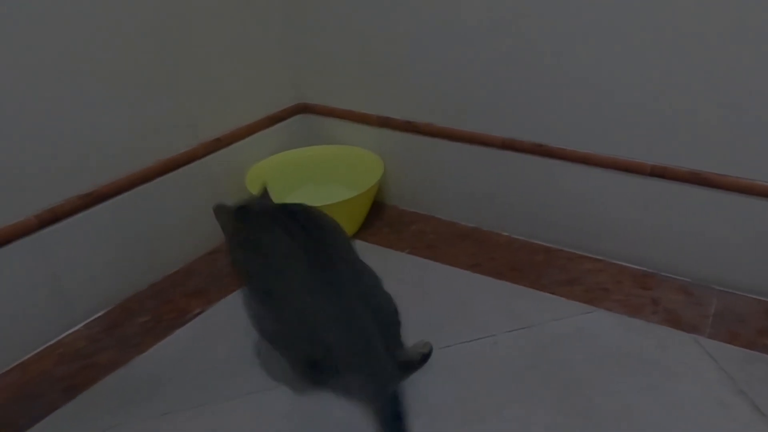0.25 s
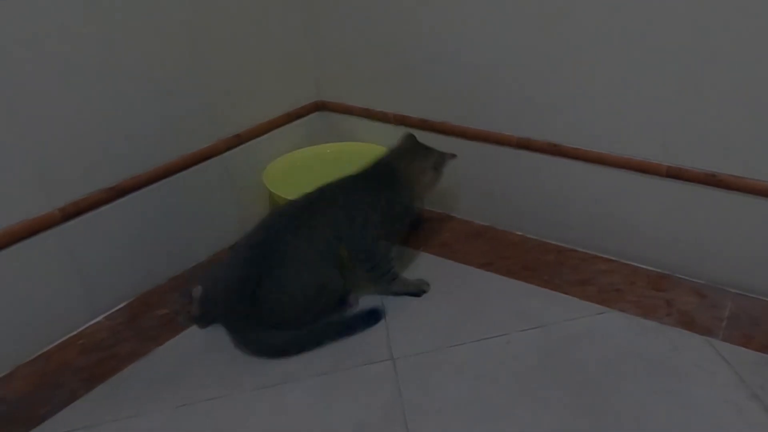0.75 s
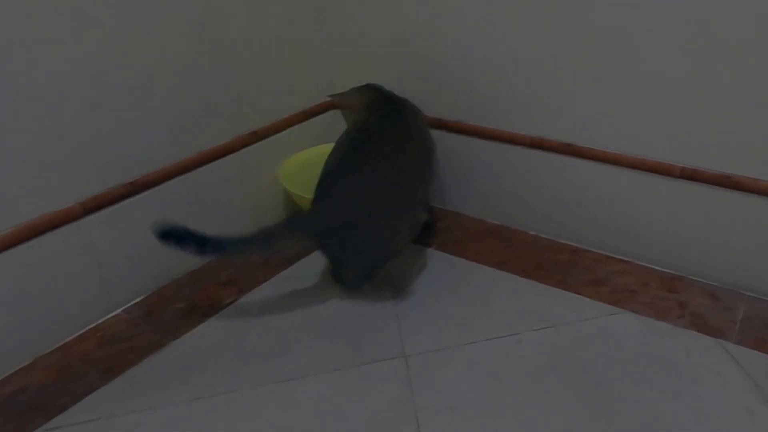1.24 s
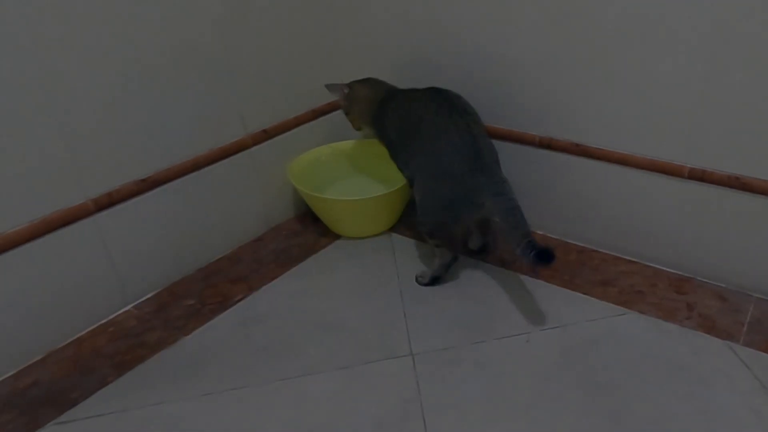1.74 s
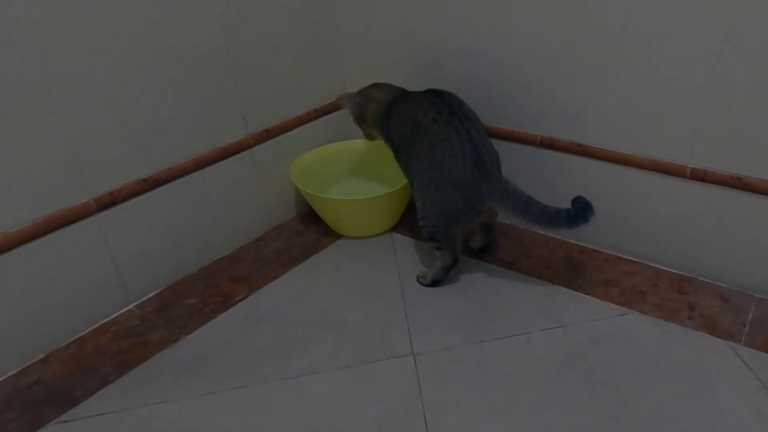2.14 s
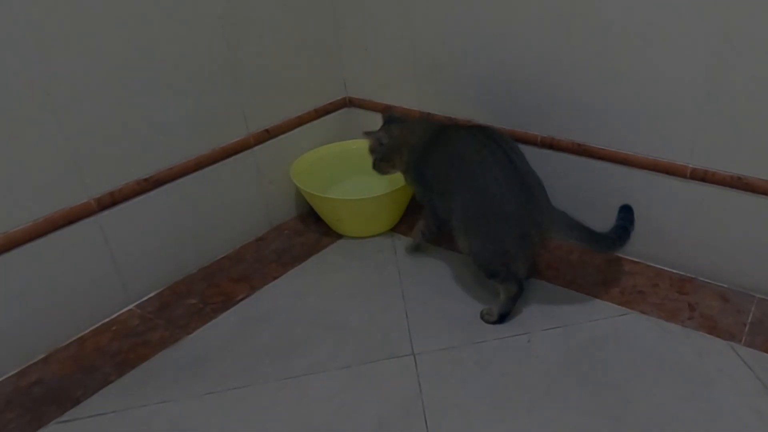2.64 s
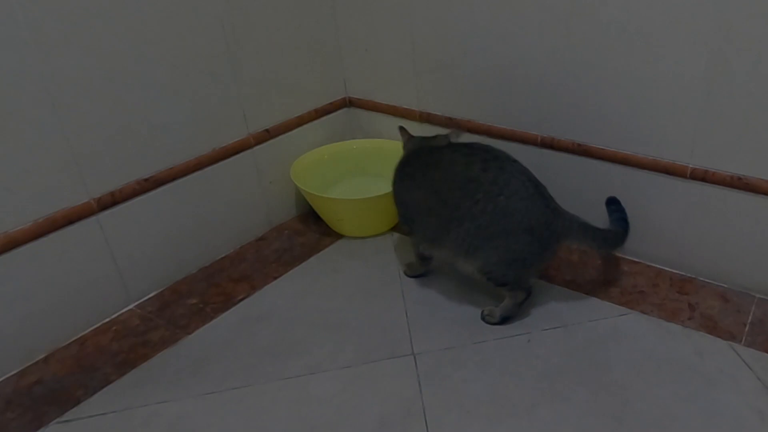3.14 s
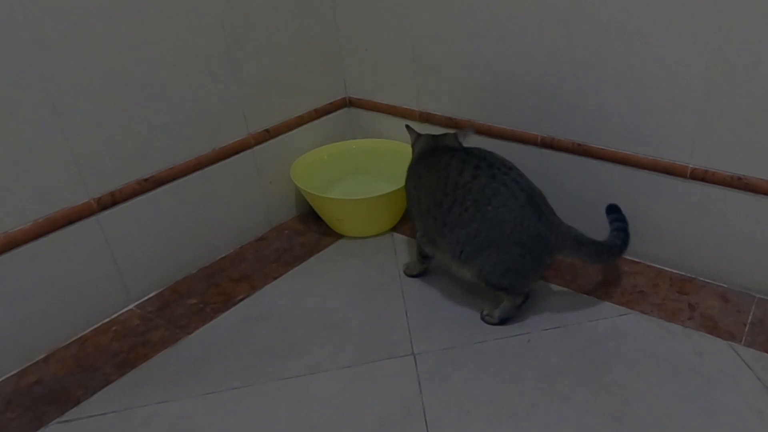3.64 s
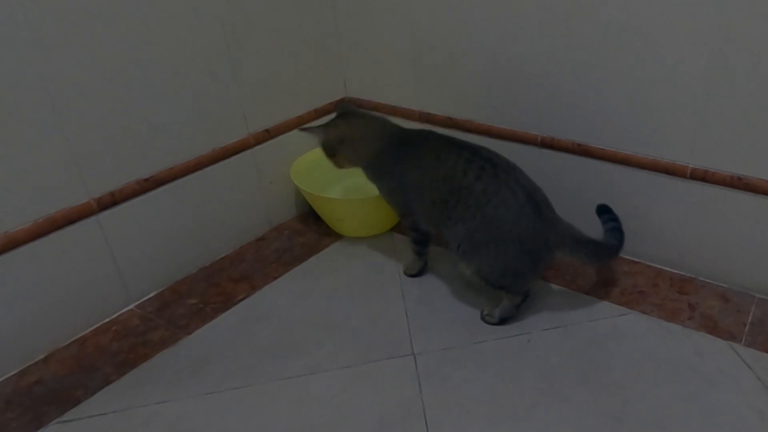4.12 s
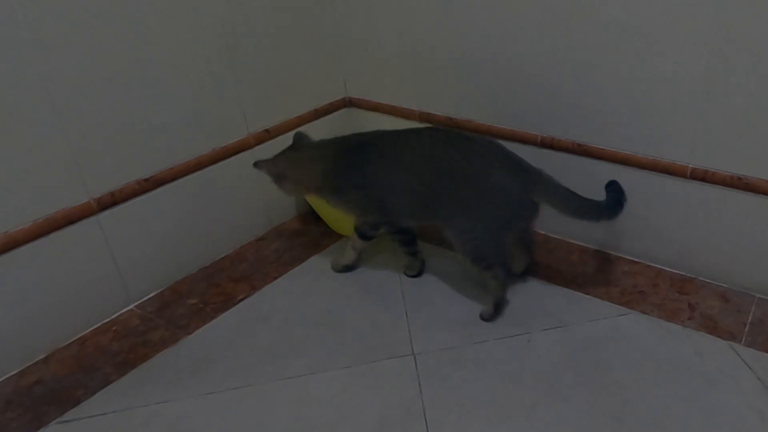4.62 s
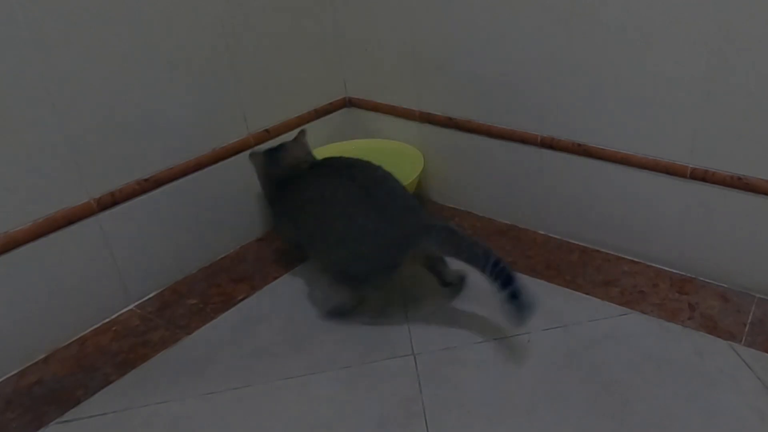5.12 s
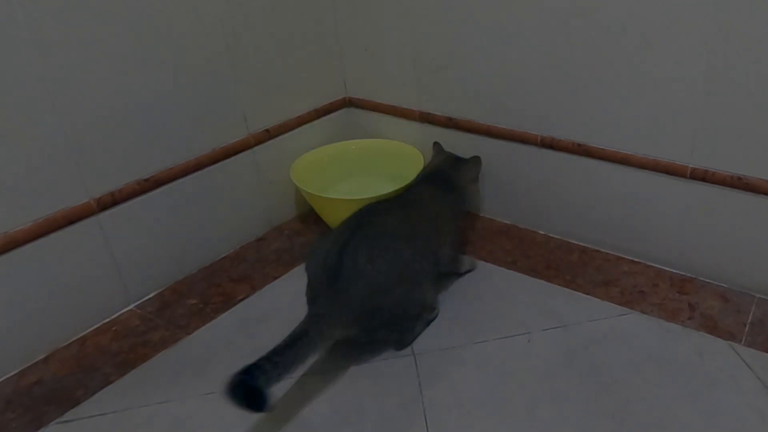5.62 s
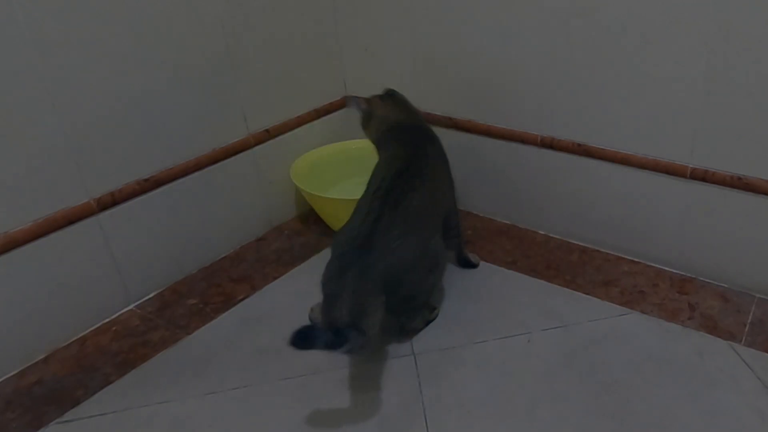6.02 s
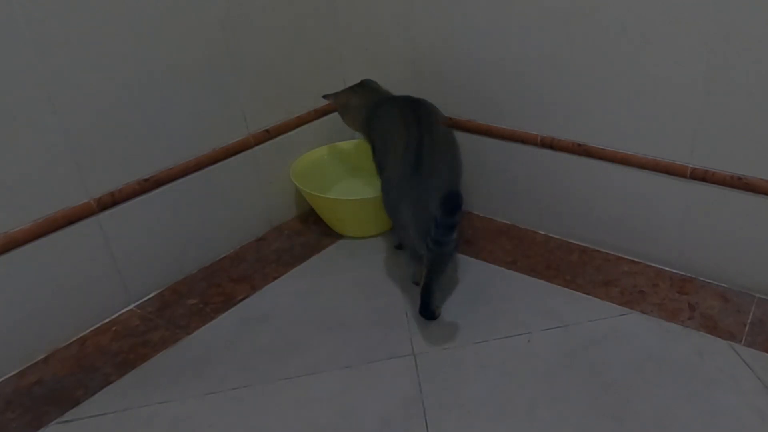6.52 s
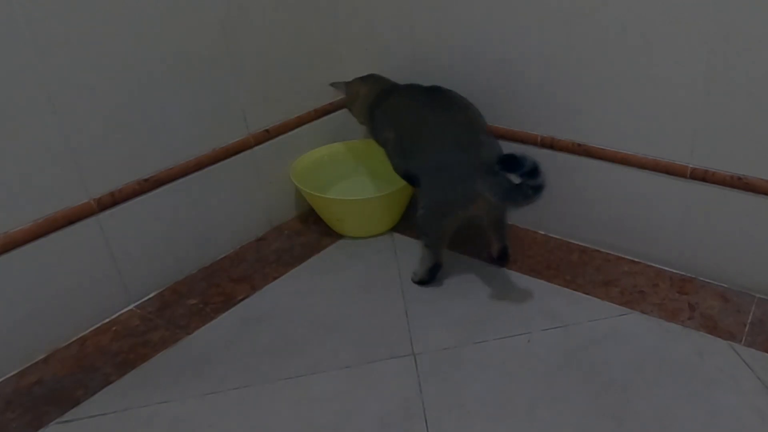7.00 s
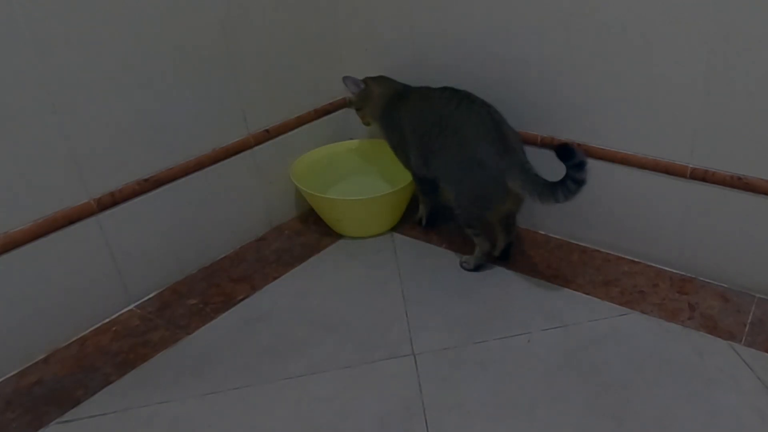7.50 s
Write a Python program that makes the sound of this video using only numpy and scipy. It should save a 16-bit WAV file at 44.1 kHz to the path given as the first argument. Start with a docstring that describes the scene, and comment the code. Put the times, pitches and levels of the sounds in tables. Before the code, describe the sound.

A cornered mouse lets out raspy squeals and tiny chirps amid paw thumps, claw ticks and sharp hisses, echoing in a tiled room over low hum.

```python
"""Cat and mouse in a tiled room

A cat corners a mouse behind a plastic basin; a steady hum, low rumble and faint moving air lie beneath.
The mouse's squeals and chirps are swept tones with overtones and rasp; hisses are shaped random clicks.
Paws thump and scuffle and claws tick as noise bursts; blows ring the basin as decaying sines.
The hard walls add a decaying noise reverberation of about a second."""
import sys
import numpy as np
from scipy import signal
from scipy.fft import rfft, irfft, next_fast_len
from scipy.io import wavfile
from scipy.ndimage import uniform_filter1d

SR = 44100
rng = np.random.default_rng(int(sys.argv[2]) if len(sys.argv) > 2 else 0)


def file_out(sig):
    """Save sig as 16-bit WAV at sys.argv[1]."""
    # one column per channel
    cols = np.atleast_2d(sig).T
    # limit, then scale
    lim = np.clip(cols, -1, 1)
    pcm = np.round(lim * 32767).astype(np.int16)
    wavfile.write(sys.argv[1], SR, pcm)


N = 342039
TIME = np.arange(N) / SR
TOP_HZ = 15200  # upper band edge

# Paw blows on basin and floor. Each row: start in seconds, level in dB, decay time in seconds,
# boom of the basin relative to the blow in dB.
THUMPS = [(.005, -38.5, 0.03, -9), (0.519, -38, 0.02, 4), (0.55, -41, 0.068, 0), (0.877, -30, 0.016, -3.5),
          (.905, -34.5, 0.081, 4.5), (1.354, -42, 0.026, -35), (1.536, -45.5, 0.039, -8.5),
          (1.733, -47.5, 0.022, -14), (2.593, -49.5, 0.077, -15), (2.815, -50.5, 0.21, 9.5),
          (3.13, -50, 0.023, 6.5), (3.73, -53.5, 0.037, -15), (4.17, -46.5, 0.12, -25)]
# Microphone pair. Each row: frequency in Hz, side minus mid of diffuse sound in dB, left minus right in dB.
PORTS = [(30.1, -6.5, -7.5), (100, -4.5, -0.5), (401, -5, -3), (1398, -5.5, 2), (2920, -4, 1.5),
         (5500, -7.5, 0.5), (9000, -5, 3.2), (12430, -2.5, 6)]


def undb(db):
    """Decibels to gain."""
    return 10 ** (np.asarray(db) / 20)


def unit(x):
    """Scale to rms 1."""
    return x / np.sqrt(np.mean(x ** 2))


def at(hz, points, axis=1):
    """Read a column of a table on a log-frequency axis."""
    table = np.array(points, float)
    return np.interp(np.log(hz + 1e-3), np.log(table[:, 0]), table[:, axis])


def shape(x, response):
    """Filter by a gain that is a function of frequency."""
    size = next_fast_len(x.shape[-1] + SR // 2)
    hz = np.fft.rfftfreq(size, 1 / SR)
    return irfft(rfft(x, size) * response(hz), size)[..., :x.shape[-1]]


def colour(x, points):
    """Give a spectrum with skirts of 40 dB per octave; white input keeps its power."""
    def response(hz):
        inside_hz = np.clip(hz + 1, points[0][0], points[-1][0])
        octaves_outside = np.abs(np.log2((hz + 1) / inside_hz))
        return unit(undb(at(hz, points) - 40 * octaves_outside))
    return shape(x, response)


def walk(rate_hz, size):
    """Smooth random wandering with spread near 1."""
    hold = max(int(SR / rate_hz), 1)
    steps = np.repeat(rng.standard_normal(size // hold + 1), hold)
    return 1.2 * uniform_filter1d(steps, hold)[:size]  # 1.2 restores the smoothed spread


def grains(rate_hz, spread_db):
    """Dense random clicks of uneven size, rms 1."""
    clicks = (rng.random(N) < rate_hz / SR) * rng.standard_normal(N)
    return unit(clicks * undb(spread_db * rng.standard_normal(N)))


def add(track, start_s, sound):
    """Mix a sound in at a time."""
    i = int(start_s * SR)
    track[i:i + len(sound)] += sound[:N - i]


def diffuse(mid, side):
    """Sound from all around: the side share at the two ports varies with frequency."""
    side = shape(side, lambda hz: undb(at(hz, PORTS)))
    return np.array([mid + side, mid - side])


def background(hum_hz=100.5, hum_db=-53, rumble_db=-53.5, air_db=-61):
    """A motor hums at about twice the mains rate over low rumble and moving air."""
    # Spectra of rumble and air. Each row: frequency in Hz, relative level in dB.
    rumble_spectrum = [(20, 0.5), (32, -4), (48, -1), (65, -1), (82, -6), (125, -9), (190, -8),
                       (260, -14.5), (500, -22), (900, -28.5)]
    air_spectrum = [(350, -46.5), (600, -13.5), (948, -21.5), (1000, -9), (1230, -10), (1380, -3),
                    (1670, -9), (1910, -8.5), (2310, -13.5), (3020, -7.5), (3650, -27), (5390, -23.5),
                    (9750, -34), (13300, -42.5), (15000, -44.5)]
    rumble_gain = undb(rumble_db + 0.8 * walk(6, N))
    rumble = rumble_gain * colour(rng.standard_normal((2, N)), rumble_spectrum)
    air_gain = undb(air_db + 0.15 * walk(2.8, N))
    air = air_gain * colour(rng.standard_normal((2, N)), air_spectrum)
    hum = undb(hum_db + 0.5 * walk(5.0, N)) * unit(np.sin(2 * np.pi * hum_hz * TIME))
    return diffuse(*(rumble + air)) + hum


def basin(boom_db=-2, build_s=0.023, wobble=0.026, lumpy_db=3):
    """Each blow sets the low modes of basin and corner ringing, with a slightly unsteady pitch and level."""
    # Modes. Each row: frequency in Hz, width in Hz (sets the decay), relative level in dB.
    modes = [(60.5, 6.5, -5), (96, 2.5, -8.5), (143.7, 2.7, -4), (188.4, 2.94, 1), (213.4, 2.14, -5.5),
             (337, 4.2, -8), (374.5, 3, -9.5), (515, 6.5, -9)]
    out, t = np.zeros(N), TIME[:SR]
    for start_s, db, _, share_db in THUMPS:
        ring = 0
        for hz, width_hz, mode_db in modes:
            cycles = np.cumsum(hz * (1 + wobble * walk(40, SR))) / SR + rng.random()
            gain = undb(mode_db + lumpy_db * walk(30, SR))
            ring = ring + gain * np.exp(-np.pi * width_hz * t) * np.sin(2 * np.pi * cycles)
        build_up = 1 - np.exp(-t / build_s)
        add(out, start_s, undb(db + share_db + boom_db) * ring * build_up)
    return out


def burst(start_s, decay_s):
    """A sudden rise and an exponential fall."""
    age = TIME - start_s
    return (age >= 0) * np.exp(-np.clip(age / decay_s, 0, 20))


def slide(peak_s, rise_s, fall_s):
    """An exponential swell up to a peak and an exponential fall after it."""
    distance = np.maximum((peak_s - TIME) / rise_s, (TIME - peak_s) / fall_s)
    return np.exp(-np.minimum(distance, 20))


def paws(tick_s=0.0026):
    """Soft blows land, feet scrape in fits and claws tick on the tiles."""
    # Feet sliding. Each row: time of the hardest push in seconds, level in dB, rise and fall in seconds.
    scuffles = [(.003, -47, .01, 0.014), (.47, -52.5, 0.028, 0.051), (.535, -41, 0.0091, 0.088),
                (.85, -45.5, 0.019, .06), (.925, -36.5, 0.0095, 0.077), (3.06, -56, 0.26, 0.084)]
    # Claw ticks. Each row: start in seconds, level in dB.
    tick_list = [(.519, -37), (.847, -38), (1.343, -29.5), (1.53, -34.5), (1.727, -39.5), (2.2, -24.5),
                 (2.5968, -37.5), (3.53, -52.5), (3.726, -50.5), (4.167, -30.5), (4.232, -34.5),
                 (5.619, -50), (6.711, -48)]
    # Spectra of blow, scrape and tick. Each row: frequency in Hz, relative level in dB.
    blow_spectrum = [(250, -3), (350, -2), (540, 4.5), (720, -3), (1020, 3.5), (1350, 1), (1800, -5.5),
                     (2400, -15), (3500, -18.5), (6000, -33)]
    scrape_spectrum = [(1400, 3), (1850, -0.5), (2550, -0.5), (3300, 3.5), (4000, -4.5), (6000, -2),
                       (8400, -12), (12000, -21), (15000, -33)]
    claw_spectrum = [(2500, -9.5), (3000, -5.5), (4000, -18), (5200, 3.5), (6200, 1), (7700, 2),
                     (9800, -20.5), (12300, -15.5), (14000, -33)]

    impact = sum(undb(db) * burst(s, decay_s) for s, db, decay_s, _ in THUMPS)
    blows = impact * grains(5000, 6.4)
    push = sum(undb(db) * slide(s, rise_s, fall_s) for s, db, rise_s, fall_s in scuffles)
    scrape = push * grains(4000, 2.5) * undb(1.35 * walk(60.1, N))
    ticks = sum(undb(db) * burst(s, tick_s) for s, db in tick_list) * rng.standard_normal(N)
    return colour(blows, blow_spectrum) + colour(scrape, scrape_spectrum) + colour(ticks, claw_spectrum)


def pressure(start_s, hold_until_s, attack_s=0.093, rise_db=11.5, release_db_per_s=329.5):
    """Pressure of one hiss as gain: it builds, holds and is let go."""
    age = TIME - start_s
    building_db = rise_db * np.clip(1 - age / attack_s, 0, 1)
    release_db = release_db_per_s * np.maximum(age - hold_until_s, 0)
    return (age >= 0) * undb(-building_db - release_db)


def hisses():
    """Forced air crackles past the teeth, and the hollow of the throat sounds with it from the start."""
    # Each row: start in seconds, length in seconds, level of air through the teeth in dB,
    # level of the hollow throat in dB, length of the throat sound in seconds.
    hiss_list = [(0.947, 0.1, -40.5, -51, 0.12), (4.27, 0.21, -28, -32, 0.22),
                 (6.083, .26, -31.5, -34, .18), (6.6, 0.13, -58.5, -76, .1)]
    # Spectra of teeth and throat. Each row: frequency in Hz, relative level in dB.
    teeth_spectrum = [(1700, -12.5), (2100, -14), (2900, -6.5), (3600, -12.5), (4400, -13.5), (5200, -5.5),
                      (6100, -3.5), (7000, -5.5), (8400, -18), (10700, -27.5), (12200, -19.5),
                      (13500, -28.5), (15000, -47)]
    throat_spectrum = [(320, -20.5), (420, -14.5), (520, -3), (740, -6.5), (920, -0.5), (1150, -3),
                       (1380, 1), (1550, -5.5), (1850, -2.5), (2200, -29)]

    teeth = sum(undb(db) * pressure(s, length_s) for s, length_s, db, _, _ in hiss_list)
    throat = sum(undb(db) * pressure(s, throat_s) for s, _, _, db, throat_s in hiss_list)
    flutter = undb(3.6 * walk(130, N))
    teeth_air = colour(flutter * teeth * grains(16000, 1.1), teeth_spectrum)
    throat_air = colour(flutter * throat * grains(8000, 4.8), throat_spectrum)
    return teeth_air + throat_air


def cries(bend_power=2.2, roughen_s=0.0082, chirp_ease=1.74, chirp_rough=0.1, chirp_overtones_db=-17.5):
    """Yield start s, pitch Hz, level dB, roughness, overtones dB: squeals roughen and bend late; chirps leap up."""
    # Each row: start in seconds, length in seconds, pitch in Hz, final bend in octaves, level in dB,
    # level change over the length in dB, roughness (0 is clean), relative overtone level in dB.
    squeals = [ (1.963, 0.18, 3177, -0.62, -35.5, -10, 0.78, -6.5),
               (2.143, 0.074, 2085, -0.098, -34, 1, 0.52, -12.5),
               (2.196, 0.033, 1458, -0.297, -31, -6.5, 1.1, -17),
               (2.442, .065, 1672, -0.1, -34, -11, 0.22, -13.5),
               (3.896, 0.049, 2797, -0.17, -31.5, -3, 0.97, -4),
               (3.961, 0.036, 1694, -.08, -36.5, -1.5, 0.57, -13),
               (4.173, 0.025, 2076, -0.048, -37.5, 3.5, 0.54, -17),
               (4.23, 0.11, 1945, -0.056, -34, -5, 0.54, -4),
               (4.351, .155, 2995, .17, -45.5, -1.5, 0.4, 10),
               (6.071, 0.081, 2787, -0.26, -35.5, 5.5, 0.88, -10.5),
               (6.177, .14, 2554, 0.12, -34.5, 1, .95, -13.5),
               (6.194, 0.041, 2977, .02, -46, -8, 0.47, 12.5),
               (6.284, 0.046, 2980, 0.19, -34, -6, 0.32, 0.5)]
    # Each row: start in seconds, length in seconds, first pitch in Hz, last pitch in Hz, level in dB.
    chirps = [(2.981, .009, 2775, 3340, -36.5), (4.891, 0.017, 2090, 3446, -34.5),
              (5.165, 0.01, 2800, 3445, -33.5), (7.054, 0.0097, 2680, 3770, -40)]
    for start_s, length_s, hz, bend, db, swell_db, rough, over_db in squeals:
        u = np.linspace(0, 1, int(length_s * SR))
        pitch_hz = hz * 2 ** (bend * u ** bend_power)
        hoarse = rough * (1 - np.exp(-u * length_s / roughen_s))
        yield start_s, pitch_hz, db + swell_db * u, hoarse, over_db
    for start_s, length_s, from_hz, to_hz, db in chirps:
        left = np.linspace(1, 0, int(length_s * SR))
        pitch_hz = to_hz + (from_hz - to_hz) * left ** chirp_ease
        yield start_s, pitch_hz, db, chirp_rough, chirp_overtones_db


def larynx(jitter=0.0626, stagger=0.055, flutter_db=5.0, slope_db=-4, edge_s=0.00081,
           rasp_db=-1, overtone_db=-3):
    """A tiny larynx whistles; strain staggers its pitch and adds rasp, and the mouth picks out overtones."""
    # What the small mouth passes of overtones and rasp. Each row: frequency in Hz, relative level in dB.
    mouth_spectrum = [(2600, 4), (3400, -21), (3900, 4), (4500, 1.5), (5700, 8), (6800, 5.5), (8000, -5),
                      (10000, -8), (12200, -16), (14000, -27)]
    rasp_spectrum = [(950, -3), (1300, -4), (2000, 0), (3000, 5.5), (4400, 1), (5500, 3), (7500, 0),
                     (8500, -6), (10500, -13), (12300, -9.5), (13800, -31.5)]
    tone, overtones, rasp = np.zeros((3, N))
    for start_s, hz, db, rough, over_db in cries():
        size = len(hz)
        age = TIME[:size]
        slow, fast, flutter = (walk(rate_hz, SR // 4)[:size] for rate_hz in (219.1, 1800, 350))
        air = rng.standard_normal(size)

        unsteady_hz = hz * (1 + rough * (jitter * slow + stagger * fast))
        phase = 2 * np.pi * np.cumsum(unsteady_hz) / SR
        edges = np.clip(np.minimum(age, age[::-1]) / edge_s, 0, 1)
        swell = edges * undb(db) * unit(undb(flutter_db * rough * flutter))
        top_harmonic = int(TOP_HZ / np.median(hz))
        stack = sum(undb(slope_db * k) * np.sin(k * phase) for k in range(2, top_harmonic + 1))

        add(tone, start_s, swell * unit(np.sin(phase)))
        add(overtones, start_s, swell * undb(over_db) * unit(stack))
        add(rasp, start_s, swell * rough * air)
    voiced = tone + undb(overtone_db) * colour(overtones, mouth_spectrum)
    return voiced + undb(rasp_db) * colour(rasp, rasp_spectrum)


def room(dry, wet_db=3.0, gap_s=0.00068):
    """Dense reflections from tile and plaster die away at a rate set by frequency."""
    # Reverberation. Each row: frequency in Hz, time to fall by 60 dB in seconds.
    decay_times = [(150, 2.63), (500, 0.74), (1500, 1.04), (3000, 0.87), (6000, 1), (12000, 0.46)]
    size = 3 * SR // 2
    t = TIME[:size]
    centres_hz = np.geomspace(125, 16000, 8)
    noise = rng.standard_normal((2, size))
    tail = 0
    for centre_hz, weights in zip(centres_hz, np.eye(len(centres_hz))):
        crossfade = np.column_stack([centres_hz, weights])  # overlapping triangular bands
        band = shape(noise, lambda hz: at(hz, crossfade))
        tail = tail + band * undb(-60 * t / at(centre_hz, decay_times))
    tail = tail * np.clip(t / gap_s - 1, 0, 1)  # silent for gap_s, full at twice that
    tail = undb(wet_db) * unit(tail) / np.sqrt(size)
    mid, side = (signal.fftconvolve(dry, response)[:N] for response in tail)
    return diffuse(dry + mid, side)


def scene():
    """Mouse and cat share the corner and its echo."""
    animals = undb(-3.0) * (larynx() + hisses() + paws())
    return room(animals) + basin() + background()


def record(dry):
    """The left port is the brighter one; the top is cut steeply."""
    ports = shape(dry, lambda hz: undb(np.outer([0.5, -0.5], at(hz, PORTS, axis=2))))
    top_cut = signal.ellip(8, 0.2, 70, TOP_HZ, fs=SR, output="sos")
    return signal.sosfilt(top_cut, ports)


dry = scene()
out = record(dry)
file_out(out)
```